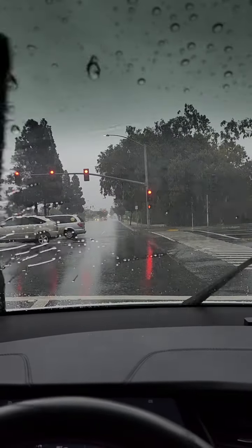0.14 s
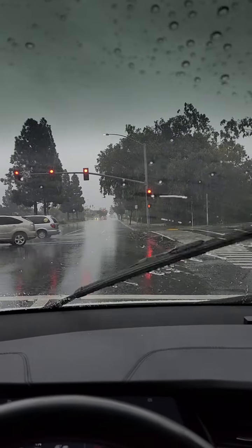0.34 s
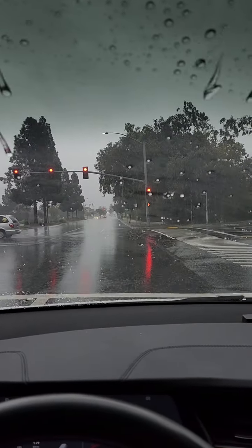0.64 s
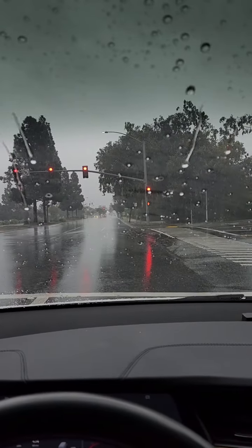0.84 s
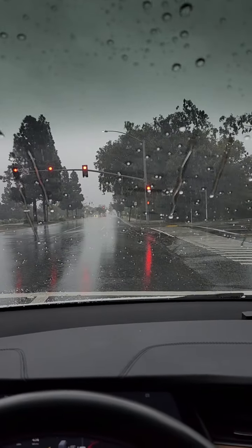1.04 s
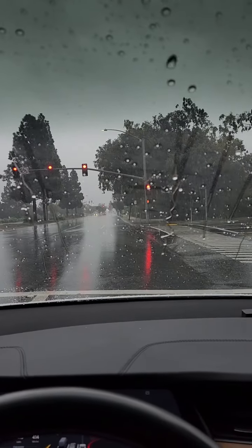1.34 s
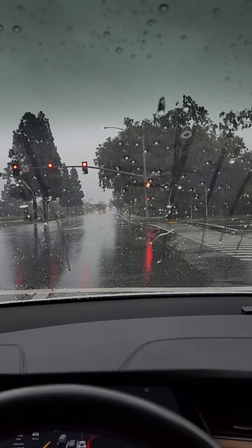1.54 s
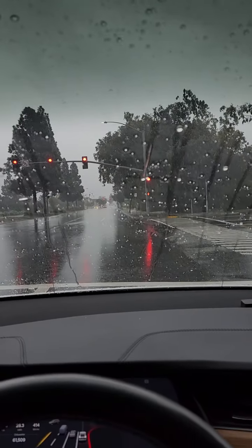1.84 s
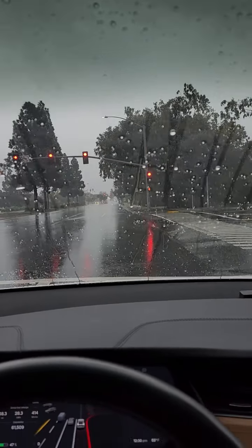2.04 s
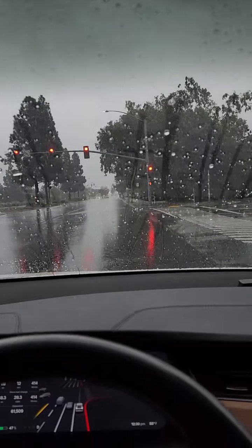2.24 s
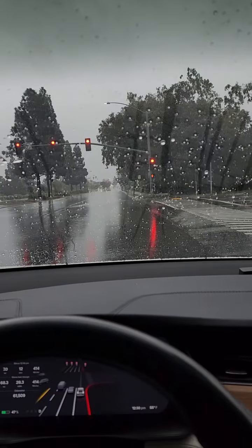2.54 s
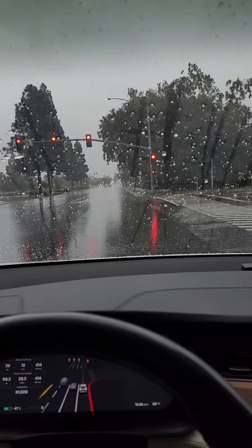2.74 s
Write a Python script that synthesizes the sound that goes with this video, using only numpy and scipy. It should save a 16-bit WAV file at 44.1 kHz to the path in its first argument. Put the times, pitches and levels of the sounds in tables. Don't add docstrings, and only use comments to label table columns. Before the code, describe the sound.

Inside a parked-still car, dense rain hiss slowly eases while the shell booms. A wiper thumps and scrapes at the start, left side; the right microphone carries lumpy deep rumble and small pops throughout.

```python
import sys
import numpy as np
from scipy import signal
from scipy.fft import rfft, irfft
from scipy.io import wavfile

SR = 44100
rng = np.random.default_rng(int(sys.argv[2]) if len(sys.argv) > 2 else 0)


def gain_from_db(level_db):
    decades = np.asarray(level_db, float) / 20
    return 10 ** decades


def unload_audio(sound):
    columns = np.transpose(np.atleast_2d(sound))
    steps = np.round(np.clip(columns, -1, 1) * 32767)
    wavfile.write(sys.argv[1], SR, steps.astype(np.int16))


N = 127890
T = np.arange(N) / SR


def evened(x):
    return x / np.sqrt(np.mean(x ** 2) + 1e-20)


def read(points, hz):
    f, db = np.transpose(points)
    return np.interp(np.log(hz + 1), np.log(f + 1), db)


def curve(points):
    return gain_from_db(np.interp(T, *np.transpose(points)))


def colour(x, points, ends_db=-60):
    hz = np.fft.rfftfreq(len(x), 1 / SR)
    above = np.log2(np.maximum((hz + 1) / points[-1][0], 1))
    below = np.log2(np.maximum(points[0][0] / (hz + 1), 1))
    gain = gain_from_db(read(points, hz) + ends_db * (above + below))
    return irfft(rfft(x) * gain, len(x))


def noise(points):
    return colour(rng.standard_normal(N) * np.sqrt(SR / 2), points)


def wander(rate_hz, depth_db):
    hz = np.fft.rfftfreq(N, 1 / SR)
    drift = rfft(rng.standard_normal(N)) / (1 + (hz / rate_hz) ** 2)
    return gain_from_db(depth_db * evened(irfft(drift, N)))


def band(hz, width_hz):
    f = np.fft.rfftfreq(N, 1 / SR)
    resonance = 1 / (1 + ((f - hz) / width_hz * 2) ** 2)
    return evened(irfft(rfft(rng.standard_normal(N)) * resonance, N))


def struck(s, rise_s, t60):
    out = np.zeros(N)
    near = slice(*np.searchsorted(T, [s, s + 1.5 * t60]))
    out[near] = (1 - np.exp((s - T[near]) / rise_s)) * gain_from_db(-60 * (T[near] - s) / t60)
    return out


def swell(s, db, length, hz=0):
    out = np.zeros(N)
    near = slice(*np.searchsorted(T, [s - 4 * length, s + 4 * length]))
    u = T[near] - s
    out[near] = gain_from_db(db) * np.exp(-(u / length) ** 2) * np.cos(2 * np.pi * hz * u)
    return out


def splat(clicks):
    # f/Hz, level/dB
    splat_tone = [(250, 9), (700, -3.5), (2600, -8), (5400, -10.5), (7900, -6), (9500, -28.5), (11500, -22),
                  (15500, -22.5)]
    kind, t = rng.integers(0, 12, N), np.arange(600) / SR
    shapes = rng.standard_normal((12, 600)) * gain_from_db(-60 * t / 0.0079)
    out = np.zeros(N)
    for k in range(12):
        out += signal.oaconvolve(clicks * (kind == k), shapes[k])[:N]
    return colour(out, splat_tone)


def splats_at(events):
    clicks = np.zeros(N)
    for s, db in events:
        clicks[round(s * SR)] = gain_from_db(db + 16)
    return splat(clicks)


def rain_wash():
    # f/Hz, density/dB per Hz
    panels = [(320, -76.5), (700, -83), (1500, -87), (2500, -83.5), (3500, -88.5), (5400, -97), (7900, -96),
              (9400, -117)]
    # f/Hz, density/dB per Hz
    top_air = [(8000, -125), (9800, -115), (11500, -111), (15500, -113)]
    return noise(panels) * wander(52, 1.0) + noise(top_air) * wander(90, 1.4) * wander(8, .8)


def patter():
    drops_per_s, level_db, spread_db = 700, -54.5, 2
    size = gain_from_db(spread_db * np.minimum(rng.exponential(1, N), 4))
    lands = rng.random(N) < drops_per_s / SR
    return gain_from_db(level_db) * evened(splat(size * lands))


def rain():
    ease_db_per_s = -0.91
    return (rain_wash() + patter()) * gain_from_db(ease_db_per_s * (T - 1.0))


def shell_boom():
    # f/Hz, density/dB per Hz
    boom = [(18, -66), (42, -62), (60, -55), (85, -55), (135, -59), (165, -61), (205, -71), (260, -84)]
    # t/s, level/dB
    strength = [(0, 3), (.16, 2), (.2, -3), (.3, 3), (.75, 1), (.85, -4), (1.25, -4), (1.4, 2), (1.7, -2),
                (2.9, -2)]
    return noise(boom) * curve(strength)


def knock(s, db, hz, t60):
    width_hz, tone_share = 250, 0.47
    tone = np.sqrt(2) * np.sin(2 * np.pi * hz * (T - s))
    ring = struck(s, 0.0013, t60) * (tone_share * tone + (1 - tone_share) * band(hz, width_hz))
    return gain_from_db(db) * evened(ring) * np.sqrt(t60 / 14 * SR / N)


def linkage_knocks():
    # t/s, level/dB, f/Hz, t60/s
    blows = [(0, -35.5, 234, 0.26), (.108, -40, 400, 0.088), (.187, -33, 399, 0.16), (.189, -45, 624, 0.11),
             (.246, -37.5, 333, 0.14), (.255, -38.5, 520, 0.13), (.277, -36.5, 350, 0.15),
             (.285, -44, 500, 0.14), (.434, -36, 342, 0.065), (.545, -44, 310, 0.14),
             (.697, -39.5, 376, 0.079), (.705, -42.5, 557, 0.12), (.742, -40.5, 298, 0.11),
             (1.386, -48, 685, 0.051), (1.393, -40, 385, 0.083), (1.414, -46, 401, .2),
             (1.532, -42, 353, 0.1)]
    return sum(knock(*row) for row in blows)


def motor_hum():
    # start/s, end/s, f/Hz, level/dB
    hums = [
        (-.2, 3.1, 30.6, -42),
        (.88, 1.32, 119, -35),
        (2.46, 3.1, 121, -37),
        (-.2, 3.1, 318, -63),
    ]
    out = np.zeros(N)
    for start, end, hz, db in hums:
        on = np.clip(np.minimum(T - start, end - T) / 0.016, 0, 1)
        level = gain_from_db(db) * on * wander(1.6, 1.0)
        phase = 2 * np.pi * np.cumsum(hz * wander(4.97, 0.1403)) / SR
        out += level * np.sqrt(2) * np.sin(phase)
    return out


def buffeting():
    # f/Hz, density/dB per Hz
    rumble = [(12, -36.5), (30, -30.5), (50, -36), (78, -33.5), (100, -39.5), (125, -55)]
    edge = [(120, -54), (200, -68), (320, -86), (560, -103)]
    residue = [(600, -96), (1000, -111), (1900, -120), (4000, -131), (10800, -140), (11500, -113),
               (15500, -125)]
    # t/s, level/dB
    gust = [(0, -1.5), (.5, -4.5), (1.0, -3), (1.75, -3.5), (2.1, -3), (2.5, -2), (2.9, -0.5)]
    # t/s, level/dB, f/Hz, length/s
    lumps = [(0.009, -11.5, 61, 0.0095), (0.059, -9.5, 55, 0.0057), (0.106, -7.5, 47.7, 0.016),
             (0.177, -11.5, 48, 0.0071), (0.261, -11.5, 59, 0.0074), (0.309, -12, 49, 0.023),
             (0.347, -9, 59.7, 0.0047), (0.384, -5.5, 59, 0.0065), (0.466, -6.5, 72.6, 0.0059),
             (0.525, -6.5, 46.7, 0.007), (0.583, -12, 61, 0.0068), (0.672, -9, 58.6, 0.015),
             (0.787, -9.5, 60, 0.0062), (0.838, -10, 60.7, 0.0074), (0.919, -9.5, 52, 0.014),
             (0.974, -12.5, 51.4, 0.0072), (1.031, -11, 42.6, 0.02), (1.08, -20, 60.4, 0.006),
             (1.144, -8.5, 55.2, 0.012), (1.332, -4.5, 62, 0.0049), (1.412, -7.5, 42.5, 0.004),
             (1.543, -6.5, 69, 0.0087), (1.616, -5.5, 55, 0.0047), (1.732, -10, 65, 0.014),
             (1.825, -6.5, 60.4, 0.0058), (1.918, -6.5, 69.4, 0.023), (2.042, -11, 56.3, 0.0041),
             (2.093, -8.5, 47.2, 0.018), (2.177, -7, 55, 0.028), (2.243, -11, 57.3, 0.011),
             (2.309, -4.5, 47, 0.015), (2.428, -4.5, 58.5, 0.007), (2.475, -6.5, 48.6, 0.0071),
             (2.519, -3.5, 44.4, 0.011), (2.568, -2, 55, 0.0078), (2.68, -16, 53.7, 0.028),
             (2.736, -6, 62.5, 0.0091), (2.806, -8, 57.4, 0.007), (2.89, -6, 62, 0.012)]
    # t/s, level/dB, f/Hz, length/s
    end_lumps = [
        (0, -18, 45, .004),
        (2.9, -18, 45, .004),
    ]
    lulls = [0.162, .61, 0.742, .96, 1.109, 1.22, 1.499, 1.58, 1.78, 1.861, 1.979, 2.45]
    trim_db, stretch, lump_duck = -2, 1.16, 0.53
    lull_s, lull_duck, edge_rise = 0.021, 0.51, .4
    flutter = wander(25, .8)
    between = np.ones(N)
    for s, db, hz, length in lumps:
        between *= 1 - lump_duck * swell(s, 0, length * stretch)
    for s in lulls:
        between *= 1 - lull_duck * swell(s, 0, lull_s)
    air = noise(rumble) * between + noise(edge) / between ** edge_rise
    out = air * flutter * curve(gust) + noise(residue) * wander(30, 0.93)
    for s, db, hz, length in list(lumps) + list(end_lumps):
        out += swell(s, db + trim_db, length * stretch, hz)
    return out


def thumps():
    # centre t/s, level/dB, f/Hz, half length/s
    dull_blows = [(.0065, -17.5, 161, 0.03), (.032, -17, 55.6, 0.012), (.15, -30, 161, 0.013),
                  (.192, -26.5, 168, 0.0082), (.245, -32, 170, 0.017), (.312, -27.5, 150, 0.032),
                  (0.298, -27, 61.4, 0.036), (.36, -29, 151, 0.017), (0.386, -23, 68.5, 0.038),
                  (.455, -29.5, 138, 0.022), (.695, -38.5, 203, 0.013), (.74, -27.5, 132, 0.045),
                  (0.756, -28, 69.5, 0.026), (1.335, -20.5, 61, 0.033), (1.405, -26, 187, 0.0078),
                  (1.435, -23, 145, 0.029), (1.458, -23.5, 66.5, 0.042), (1.628, -33, 72, 0.047)]
    return sum(swell(s, db, length, hz) for s, db, hz, length in dull_blows)


def wiper_drag():
    # t/s, level/dB
    sweep = [(.11, -64), (.15, -49), (.175, -45), (.193, -38.5), (.212, -46), (.24, -41.5), (.265, -48),
             (.296, -47.5), (.33, -60)]
    # f/Hz, level/dB
    blade = [(250, 3), (700, -5.5), (1500, -11), (2900, -3.5), (4500, -8), (7900, -9), (9500, -25.5),
             (15500, -23)]
    # t/s, level/dB, f/Hz, length/s
    chatter = (0.232, -39.5, 3000, 0.028)
    on = np.clip(np.minimum(T - sweep[0][0], sweep[-1][0] - T) / 0.0067, 0, 1)
    uneven = rng.standard_normal(N) * wander(160, 1.5)
    drag = evened(colour(uneven, blade)) * curve(sweep) * on
    s, db, hz, length = chatter
    return drag + swell(s, db, length) * band(hz, 2200)


def rubber_slips():
    # t/s, level/dB
    slips = [(.161, -45), (.177, -43), (.187, -33), (.197, -34), (.204, -39), (.219, -37), (.241, -36),
             (.248, -41), (.297, -43)]
    return splats_at(slips)


def pop(s, db, hz, length):
    spectrum = [(20, 0), (900, 0), (1500, -14), (4000, -2), (10000, 8)]
    burst = colour(swell(s, 0, length) * band(hz, .8 * hz), spectrum, ends_db=-20)
    return gain_from_db(db) * evened(burst) * np.sqrt(length * SR / N)


def air_pops():
    # t/s, level/dB, f/Hz, length/s
    bursts = [(.225, -51, 550, .012), (.240, -52, 800, .003), (.462, -50, 650, .012),
              (.555, -54, 500, .006), (.765, -49, 550, .005), (1.616, -44, 500, .006),
              (1.690, -45, 500, .003), (1.826, -45, 550, .008), (1.915, -50, 380, .005),
              (2.298, -46, 400, .005), (2.668, -56, 450, .005), (2.718, -57, 450, .005),
              (2.805, -43, 500, .008), (2.865, -48, 380, .005)]
    return sum(pop(*row) for row in bursts)


def fine_ticks():
    # t/s, level/dB
    hits = [(0.3966, -65), (0.4235, -61.5), (0.49, -51), (0.5254, -59), (0.698, -60), (1.1395, -64),
            (1.1824, -64), (1.2428, -60.5), (1.2803, -63), (1.3153, -60), (1.3747, -58.5), (1.3934, -64),
            (1.4952, -72.5), (1.5165, -65), (1.569, -67), (1.587, -67), (1.631, -64), (1.669, -62.5),
            (1.7237, -61), (1.8943, -63.5), (1.9746, -69), (1.994, -60.5), (2.1312, -61), (2.1582, -62),
            (2.1776, -62), (2.243, -68), (2.3482, -57), (2.4834, -68), (2.6473, -60), (2.666, -59),
            (2.7698, -63.5), (2.8242, -64.5)]
    trim_db, t60 = 8, .005
    return band(12500, 6000) * sum(gain_from_db(db + trim_db) * struck(s, 0.00026, t60) for s, db in hits)


def bright_tick():
    # t/s, level/dB
    bright_hit = (.495, -55)
    s, db = bright_hit
    return gain_from_db(db) * struck(s - .004, 0.0022, 0.047) * band(14000, 3000)


def large_drops():
    # t/s, level/dB
    drops = [(0.5418, -44), (0.681, -47), (0.892, -48), (1.0396, -46), (1.1384, -46), (1.2796, -45),
             (1.3933, -45), (1.5949, -47), (1.6772, -45), (1.8274, -48), (1.9157, -47), (2.0319, -47),
             (2.1307, -49), (2.1576, -48), (2.2394, -44), (2.5068, -47), (2.666, -47), (2.7982, -46)]
    return splats_at(drops)


def squeak(s, length, hz, glide, db):
    fuzz = signal.hilbert(band(1000, 400))
    turns = (hz - 1000) * T + glide * (T - s) ** 2 / 2
    return swell(s, db - 3, length / 2) * (fuzz * np.exp(2j * np.pi * turns)).real


def rubber_squeaks():
    # t/s, length/s, f/Hz, glide/Hz per s, level/dB
    whistles = [(.70, .03, 11500, 0, -70), (.80, .07, 11600, 0, -68), (.695, .04, 9600, 2, -73),
                (0.844, .04, 9600, -5000, -71), (2.34, .06, 11600, 8995, -66),
                (2.38, .05, 12000, -3000, -69.5), (2.41, 0.024, 11300, -20000, -72),
                (2.524, .06, 10700, 2, -73), (2.607, 0.062, 11600, -25000, -70)]
    return sum(squeak(*row) for row in whistles)


def scene():
    water = rain() + fine_ticks() + bright_tick() + large_drops()
    body = shell_boom() + linkage_knocks() + motor_hum() + thumps()
    wiper = wiper_drag() + rubber_slips() + rubber_squeaks()
    covered_port = buffeting() + air_pops()
    return np.array([water + body + wiper, covered_port])


def low_pass(x):
    return signal.sosfilt(signal.butter(12, 15750, fs=SR, output="sos"), x)


def record(dry):
    return low_pass(dry)


dry = scene()
out = record(dry)
unload_audio(out)
```